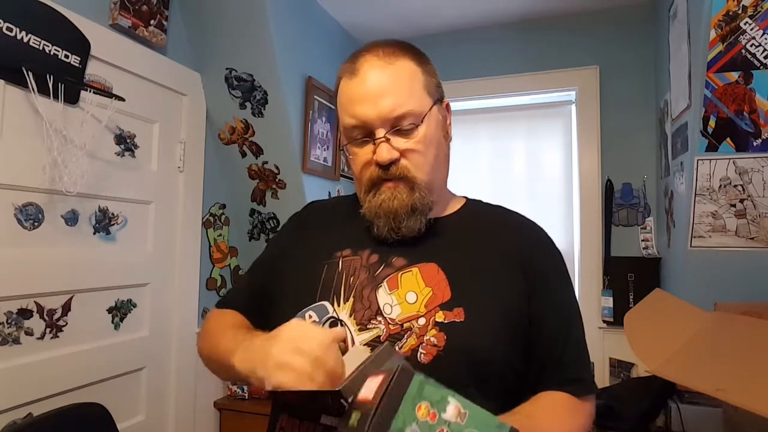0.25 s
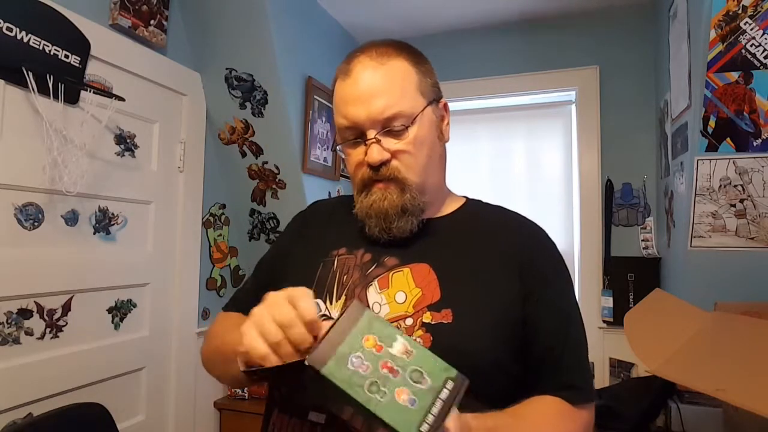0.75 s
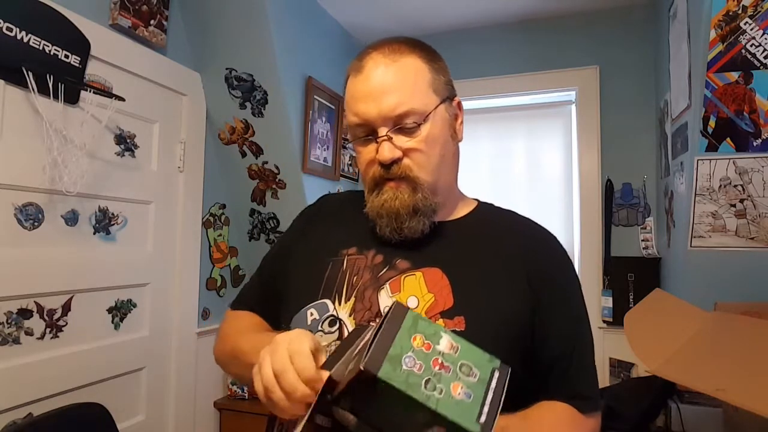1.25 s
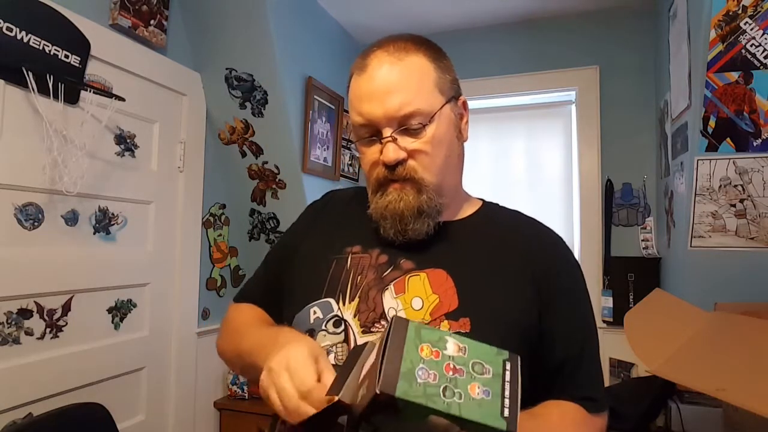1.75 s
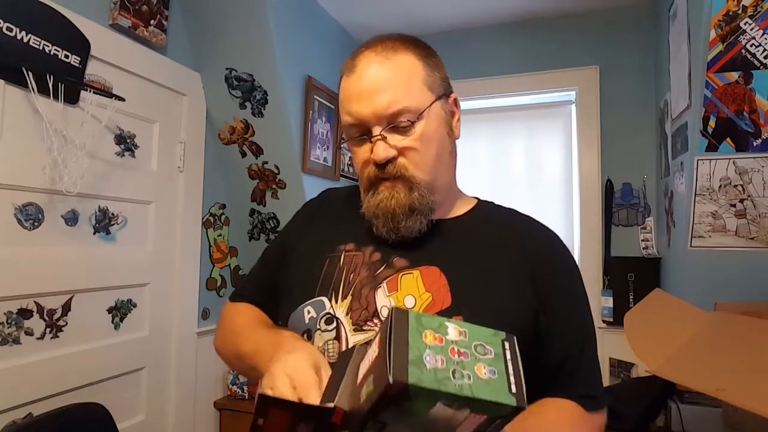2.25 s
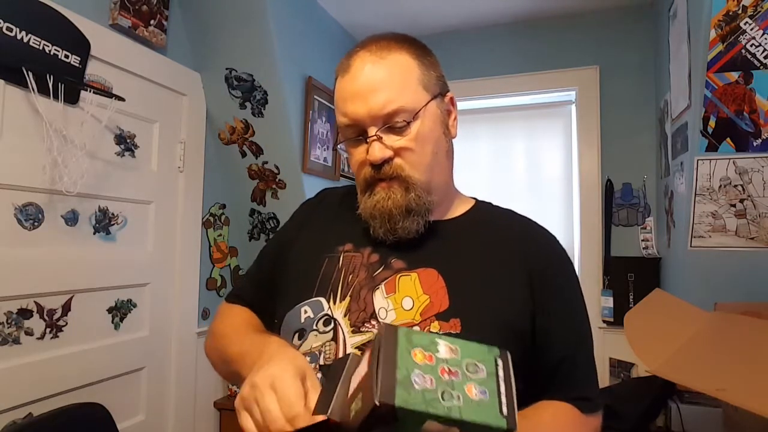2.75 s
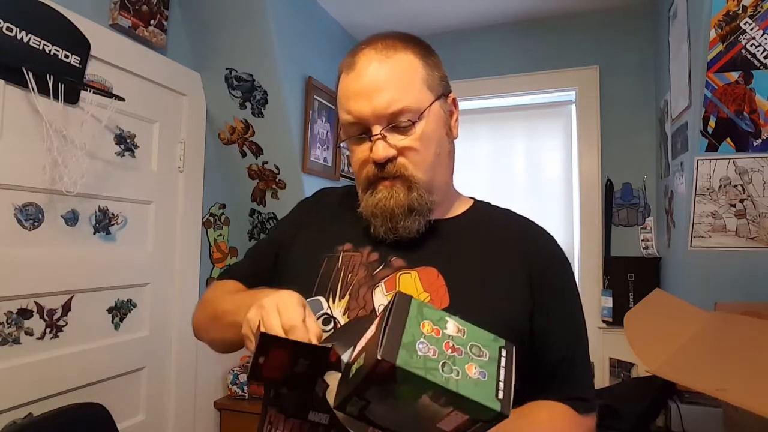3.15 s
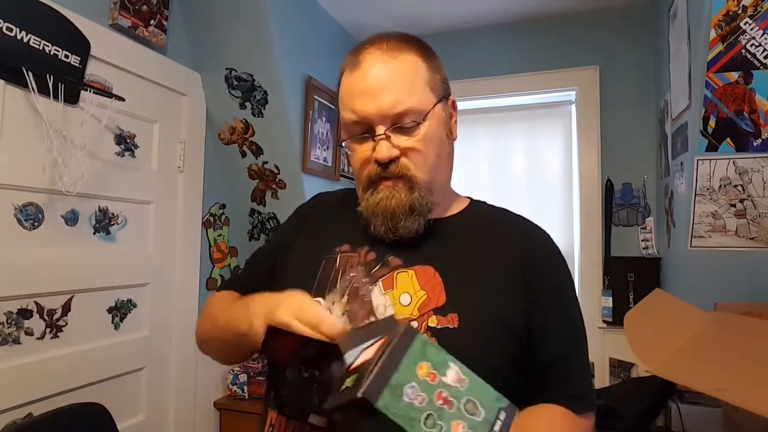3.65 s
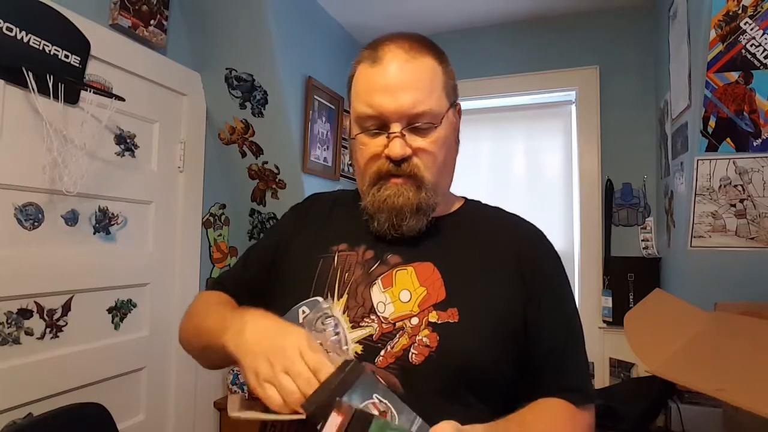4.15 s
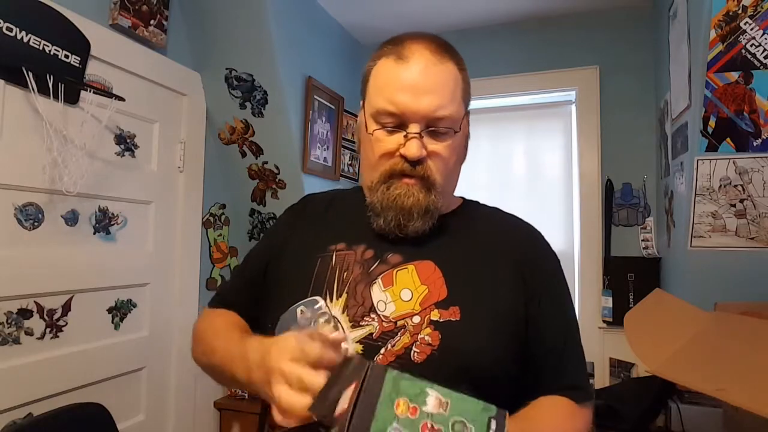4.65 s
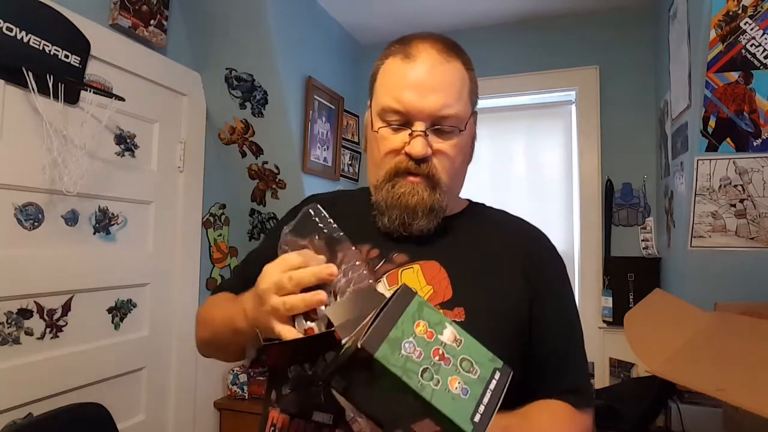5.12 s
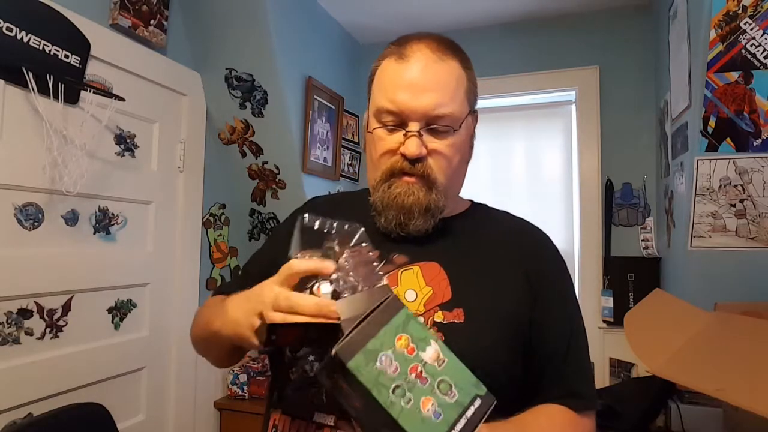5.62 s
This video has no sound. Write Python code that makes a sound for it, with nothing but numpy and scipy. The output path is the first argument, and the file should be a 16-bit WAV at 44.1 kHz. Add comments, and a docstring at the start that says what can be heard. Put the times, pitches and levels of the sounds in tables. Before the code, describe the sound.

Close in a small quiet room, hands work at a small cardboard box: soft rubs and light hollow knocks, one early snap, then sharp cracks around two seconds and a dense cluster of pops past three seconds. Quieter sliding and tapping follows, with faint plastic crinkling near the end. Stereo microphone about an arm's length away, over low room noise.

```python
"""A brief rub and light knocks, then a snap: hands open a small cardboard box and slide out a plastic tray.
Card snaps as short noise bursts; fingers and tray tap the walls as softer bursts with a wall note.
Strokes rasp as random stick-slip clicks, a few squeaks glide, and late on the tray crinkles.
The hollow box colours every contact, an arm's length away; a small room answers over faint rumble, hiss and hum."""
import sys
import numpy as np
from scipy import signal
from scipy.fft import rfft, irfft
from scipy.io import wavfile
from scipy.ndimage import uniform_filter1d

SR = 44100
rng = np.random.default_rng(int(sys.argv[2]) if len(sys.argv) > 2 else 0)


def transcribe(signal):
    """Save signal, clipped to [-1, 1], as a 16-bit WAV file at the path in sys.argv[1]."""
    frames = np.atleast_2d(signal).T
    limited = np.clip(frames, -1, 1)
    pcm = np.round(limited * 32767).astype(np.int16)
    wavfile.write(sys.argv[1], SR, pcm)


N = 259308  # samples
SIZE = 32768  # burst and filter length, samples
BIN_HZ = np.maximum(np.arange(SIZE // 2 + 1) * SR / SIZE, 1)
BURST_TIME_S = np.arange(SIZE) / SR
TIME_S = np.arange(N) / SR

# All dB columns are relative levels; later stages trim them. Card snapping and buckling, with one plastic ping
# of the tray at 3.444 s: (time [s], strength [dB], crease crack [dB], fibre fizz [dB], time constant of the
# give [ms], lower ring [Hz], upper ring [Hz], upper ring [dB], facing the microphone [dB])
CARD_SNAPS = [(0.2445, 15.5, 2.5, -6.5, 2.8, 1190, 2030, 6.5, 2.5),
              (1.8106, 19, 11.5, -1.5, 2.1, 1080, 1600, 11, 4.5),
              (2.0323, 13.5, -1, -12.5, 1.7, 870, 1400, 10.5, 6),
              (2.1437, 23.5, 21.5, 12, 1.9, 1100, 1760, 7.5, 2),
              (2.781, 13.5, 7, 0, 1.27, 1070, 4190, 11.5, 5), (3.013, 2, -2.5, -6, 1, 590, 1520, 18, 2.5),
              (3.049, 20, 6.5, -7.5, 4, 1350, 2600, 4.5, 6.5),
              (3.4169, 24.5, 12, -9.5, 3.2, 530, 1660, 0.5, 1),
              (3.444, 17, 0, -3, 3.5, 453, 11500, 12.5, 6.5),
              (3.476, 22, 12.5, .5, 3.5, 1020, 2570, 6.5, 4), (3.6856, 13.5, 11, -3, 1.1, 606, 2270, 15, 4),
              (3.701, 18, 0, -10, 3.7, 586, 940, 7, 4)]
# Snap spectrum below its crack: (frequency [Hz], level [dB])
SNAP_BODY_DB = [(40, -37), (100, -9), (220, -11), (380, -0.5), (700, 3.5), (1600, 1.5)]
# A longer give moves more of the box: (frequency [Hz], gain per doubling of the give [dB])
GIVE_HEFT_DB = [(100, 8), (280, 6), (600, 0)]
# Colour of the straight sound of snaps, slightly fuller near 1500 Hz: (frequency [Hz], level [dB])
SNAP_STRAIGHT_DB = [(300, -2.5), (1500, 1), (4000, -0.5), (9000, -2)]
USUAL_GIVE_MS = 2.8
# faint soft noise burst shortly before each snap: lead, time constant, level relative to the snap's strength
LEAD_IN_S, LEAD_IN_MS, LEAD_IN_DB = 0.011, 2, -23.5

# Fingers, flap and tray knocking on the box: (time [s], strength [dB], hardness [dB], thump [dB],
# wall note [Hz], time constant of the contact [ms])
BOX_TAPS = [(0.125, 2, 0.5, 3.5, 714, 6), (0.193, -1.5, 9.5, -6, 1560, 8.3), (0.237, 4, 3, -7, 1107, 4.5),
            (0.372, -2, 2, 4, 573, 2.5), (0.455, -7, 2.5, -11, 570, 4.5),
            (0.547, 7.5, -5.5, -5.5, 680, 5.8), (0.645, 2.5, 2.5, -8, 1500, 8),
            (0.705, 7, -4, -3, 736, 5.8), (0.817, 8, 0, -14, 570, 2.5), (0.826, 2.5, -4, 10, 574, 3.2),
            (0.924, -5, -0.5, 4, 920, 3.8), (1.11, -3.5, 0.5, 0, 570, 3.6), (1.149, 1.5, -12, 1, 575, 4.3),
            (1.182, 4, 6, -3, 1460, 1.7), (1.632, 2.5, 2.5, 2, 558, 4.9), (1.936, 4.5, -2.5, -7, 1750, 2.2),
            (1.998, 0, -0.5, -9, 600, 4.1), (2.421, 3, -5.5, 3, 720, 3), (2.523, -5, 4, -10, 600, 7.1),
            (2.657, 5.5, -13, -3, 398, 4.3), (2.806, 11.5, 2, 3, 1540, 2.7),
            (2.827, 9, -1.5, -2.5, 1120, 3.5), (2.969, 4.5, -16, -1, 505, 2.6),
            (3.004, 3.5, -7, -12, 1410, 4.4), (3.277, 0.5, -7, -11, 1540, 2.7),
            (3.46, 17.5, -7, -29, 503, 3.6), (3.8227, 0, 7.5, 16, 466, 0.66),
            (3.83, 9, -21, -1.5, 474, 6.3), (4.09, -2.5, 2.5, -11, 750, 4), (4.224, 2, -24, -3, 696, 2.5),
            (4.339, 1, -26, 5.5, 680, 5.6), (4.48, -1.5, -20, 0, 604, 2.3), (4.579, -5, 1.5, 8, 570, 3.2),
            (4.689, 6, -2.5, 1.5, 1080, 4.5), (4.818, 1, -48, -2, 590, 4.7), (4.993, 7, -4, -6, 800, 1.5),
            (5.127, 11, -3, -5, 1580, 2.7), (5.23, 2, 1, -9, 564, 2.7), (5.382, -1, 7, -18, 556, 3),
            (5.462, -2, -27, -7, 565, 1.7), (5.611, -2, 12, 3, 1830, 6.2), (5.653, 4.5, -20, -5, 706, 1.6)]
# Ordinary knock spectrum: (frequency [Hz], level [dB])
KNOCK_DB = [(40, -35), (95, -6), (220, -7.5), (380, -3), (620, 1), (1050, -1), (1900, -1.5), (3900, -16.5),
            (7000, -25), (14500, -32.5)]
# A hard edge trades the hollow note for a tick: (frequency [Hz], share of the hardness [1])
HARDNESS_SHARE = [(450, -0.059), (1500, 0.2), (4000, 1)]
# A push of the hand moves the whole box: (frequency [Hz], share of the thump [1])
BOX_THUMP_SHARE = [(90, .9), (190, 1.23), (380, 0)]

# Strokes of hands, flap and tray: (start [s], length [s], finger drag [dB], card edge scrape [dB], wall note [Hz])
HAND_STROKES = [(-0.05, 0.098, -26.5, -24, 680), (0.04, 0.14, -38.5, -37.5, 600),
                (0.267, 0.14, -27.5, -35, 560), (0.475, 0.3, -41, -41.5, 617),
                (0.575, 0.17, -28.5, -35, 610), (0.72, 0.18, -25.5, -31.5, 730),
                (0.914, 0.14, -56, -44, 595), (1.03, 0.22, -46, -41.5, 577),
                (1.212, .12, -28.5, -29.5, 585), (1.361, 0.16, -47, -25, 709),
                (1.426, 0.16, -48, -28.5, 707), (1.517, 0.18, -34, -50, 560),
                (1.764, 0.16, -28.5, -34.5, 660), (1.988, 0.26, -27, -37.5, 716),
                (2.21, 0.31, -35.5, -40, 678), (2.534, 0.23, -32.5, -37, 560),
                (2.718, 0.3, -32, -39.5, 760), (2.928, 0.35, -26, -36, 635), (3.246, 0.3, -36.5, -37, 567),
                (3.53, 0.17, -25.5, -33.5, 615), (3.744, .3, -40, -37.5, 540),
                (4.021, 0.17, -32, -44.5, 635), (4.14, 0.35, -32, -41.5, 660),
                (4.47, 0.28, -38.5, -44.5, 606), (4.834, 0.26, -27.5, -33, 680),
                (4.951, .34, -28, -30.5, 600), (5.317, 0.22, -26.5, -36.5, 540),
                (5.477, 0.21, -38.5, -41, 640), (5.805, 0.16, -34, -38.5, 616)]
STROKE_ATTACK_S, STROKE_RELEASE_S = 0.052, 0.094
GRIP_DRAG_DB, GRIP_SCRAPE_DB = -45, -63  # the holding hand never lies quite still
# Dragging fingers: (frequency [Hz], level [dB])
DRAG_DB = [(30, -47), (70, -23), (120, -12), (230, -9.5), (420, -7.5), (620, -4.5), (800, -4.5),
           (1100, -6.5), (2000, -30), (6000, -68)]
# Scraping edge and faint lead-in: (frequency [Hz], level [dB])
SCRAPE_DB = [(100, -33), (500, -9), (1000, -4), (1700, 4.5), (2300, 1.5), (3200, -6.5), (5000, -16.5),
             (14000, -47.5)]
# Hiss of smooth faces: (frequency [Hz], level [dB])
HISS_DB = [(500, -49), (2000, 5), (4000, -2), (6500, -8), (9300, -15), (11000, -14), (14500, -15.5)]

# Tray flexing as it is gripped and pulled: (time [s], level [dB])
TRAY_FLEX_DB = [(4.8, -73), (5.0, -41), (5.2, -45), (5.32, -59), (5.42, -40), (5.56, -65), (5.64, -43.5),
                (5.74, -80)]
# Tray crinkle spectrum: (frequency [Hz], level [dB])
CRINKLE_DB = [(300, -20), (900, -2), (1700, 1), (3200, -4.5), (6000, -9), (14000, -22)]
# Squeaks of card on card: (start [s], length [s], pitch [Hz], glide [octaves], level [dB])
CARD_SQUEAKS = [(1.019, 0.05, 3000, -0.21, -50), (1.786, .022, 3520, -0.01, -50),
                (2.745, 0.023, 1460, 0.05, -37.5), (3.006, 0.028, 1530, -0.037, -30),
                (4.004, 0.015, 3000, -0.036, -46.5)]

# Resonances of the box and the air around it: (frequency [Hz], width [Hz], level [dB])
BOX_MODES = [(101.6, 5, 4), (125, 8.4, 3), (178, 65, 5.5), (225.6, 23, 3), (342, 86, 5.5), (371, 21, 5),
             (517, 31, 5), (591, 99, 5), (687.5, 26, 2.5), (780, 14, 0.5), (927, 75, -2), (997, 10, 1.5),
             (1175, 23, 4.5), (1437, 100, 1.5), (1800, 630, -3), (9040, 1930, 8)]
# Room decay: (frequency [Hz], T60 [s])
ROOM_T60_S = [(120, 0.31), (500, 0.11), (1000, 0.29), (2800, 0.27), (7000, 0.29), (14000, 0.15)]
# Likeness of the reflections at the two ports: (frequency [Hz], correlation [1])
PORT_CORRELATION = [(60, 0.84), (330, 0.92), (700, 0.71), (1200, -0.51), (2400, -0.07), (5000, -0.14),
                    (14000, -0.35)]
# Balance of the reflections: (frequency [Hz], left minus right [dB])
PORT_BALANCE_DB = [(100, -0.5), (350, 2), (700, -1), (1400, 2.5), (2800, -0.5), (5000, -4.5), (9000, 1.5),
                   (14000, 2.5)]
# Still room: (frequency [Hz], level [dB])
STILL_AIR_DB = [(20, -44), (55, -52), (115, -38), (200, -40), (500, -41), (1000, -48), (2500, -53),
                (6000, -67), (14500, -71.5)]
HUM_HZ = 120
TOP_HZ = 14600  # low-pass edge of the output


def snaps(ring_width=0.27, gain_db=-1.5, low_ring_db=5.5, top_db=-7.5, early_s=.003):
    """The flap pops free and panels buckle, each with two rings; rows: towards the microphone, into the room."""
    out = np.zeros((2, N))
    for time_s, strength_db, crack_db, fizz_db, give_ms, low_hz, high_hz, high_db, facing_db in CARD_SNAPS:
        body = [(hz, strength_db + db) for hz, db in SNAP_BODY_DB]
        shape = body + [(3900, crack_db), (8500, fizz_db), (14500, fizz_db + top_db)]
        heft_db = along(GIVE_HEFT_DB) * np.log2(give_ms / USUAL_GIVE_MS)
        low_ring = low_ring_db * peak(low_hz, ring_width * low_hz)
        high_ring = high_db * peak(high_hz, ring_width * high_hz)
        sound = give(give_ms, gain_db + along(shape) + heft_db + low_ring + high_ring)
        # a panel facing the microphone sends it more of the first crack
        add(out, time_s - early_s, np.array([undb(facing_db) * sound, sound]))
        lead_in = give(LEAD_IN_MS, LEAD_IN_DB + along(SCRAPE_DB) + strength_db)
        add(out, time_s - early_s - LEAD_IN_S, lead_in)
    return colour(out[0], SNAP_STRAIGHT_DB), out[1]


def taps(gain_db=-1, ring_db=7.5, ring_width=0.19, early_s=.003):
    """Light knocks: the touched wall adds its note to the knock; a hard edge adds a tick."""
    out = np.zeros(N)
    for time_s, strength_db, hardness_db, thump_db, note_hz, contact_ms in BOX_TAPS:
        shape_db = along(KNOCK_DB) + hardness_db * along(HARDNESS_SHARE) + thump_db * along(BOX_THUMP_SHARE)
        ring = ring_db * peak(note_hz, ring_width * note_hz)
        add(out, time_s - early_s, give(contact_ms, gain_db + strength_db + shape_db + ring))
    return out


def give(time_constant_ms, spectrum_db):
    """One yield or contact: a quick run of random slips through the colour of the spot."""
    age = BURST_TIME_S / (max(time_constant_ms, .2) / 1000)
    slips = rng.standard_normal(SIZE) * np.sqrt(age) * np.exp(-age)
    lead_samples = SR // 500
    burst = np.roll(even(slips, 204), lead_samples)
    return irfft(rfft(burst) * causal(spectrum_db))[:SIZE // 4]


def sliding(drag_db=0, note_db=1, scrape_db=.5, hiss_db=-19.5, hiss_growth=0.72):
    """Fingers drag over the walls, the flap's edge scrapes, and smooth faces hiss along with the edge."""
    drag, scrape = pressure()
    hiss = scrape ** hiss_growth
    walls = colour(friction(rate_hz=120, spread_db=5, smooth=0.67) * drag, DRAG_DB)
    walls = walls + undb(note_db) * wall_ring(walls)
    edge = friction(rate_hz=500, spread_db=2.5, smooth=1.0)
    edge_scrape = colour(edge * scrape, SCRAPE_DB)
    face_hiss = colour(edge * hiss, HISS_DB)
    return undb(drag_db) * walls + undb(scrape_db) * edge_scrape + undb(hiss_db) * face_hiss


def pressure():
    """Strokes swell and let go over the faint rub of the grip; gains of the drag and of the scrape."""
    drag, scrape = undb(GRIP_DRAG_DB), undb(GRIP_SCRAPE_DB)
    for start_s, length_s, drag_db, scrape_db, _ in HAND_STROKES:
        rise = (TIME_S - start_s) / STROKE_ATTACK_S
        fall = (start_s + length_s - TIME_S) / STROKE_RELEASE_S
        push = np.clip(np.minimum(rise, fall), 0, 1)
        drag = np.hypot(drag, push * undb(drag_db))
        scrape = np.hypot(scrape, push * undb(scrape_db))
    return drag, scrape


def friction(rate_hz, spread_db, smooth, window_s=.045):
    """Stick-slip: uneven random clicks over a smooth rub; a steady supply of work holds the running rms near 1."""
    sizes = undb(spread_db * np.minimum(rng.exponential(size=N), 3))
    slips = (rng.random(N) < rate_hz / SR) * sizes * rng.choice([-1, 1], N)
    rub = slips / slips.std() + smooth * rng.standard_normal(N)
    power = uniform_filter1d(rub ** 2, int(window_s * SR) + 1)
    return rub / np.sqrt(np.abs(power) + 1e-6)


def wall_ring(x, sharpness=5):
    """A resonance that follows the fingers: neighbouring patches of wall take over from one another."""
    start_s, length_s, *_, stroke_hz = np.transpose(HAND_STROKES)
    note_hz = np.interp(TIME_S, start_s + length_s / 2, stroke_hz)
    patches_hz = np.geomspace(400, 1000, 7)
    out = 0
    for hz, row in zip(patches_hz, np.eye(len(patches_hz))):
        share = np.interp(note_hz, patches_hz, row)
        out = out + signal.lfilter(*signal.iirpeak(hz, sharpness, fs=SR), x * share)
    return out


def crinkle(rate_hz=50, spread_db=5):
    """Sparse small buckles of the thin plastic tray, as stick-slip clicks."""
    flex_db = np.interp(TIME_S, *np.transpose(TRAY_FLEX_DB), left=-np.inf, right=-np.inf)
    return colour(friction(rate_hz, spread_db, smooth=0.24) * undb(flex_db), CRINKLE_DB)


def squeaks(unsteady=0.113):
    """For a moment the slips lock into a pitch, which wavers and glides."""
    out = np.zeros(N)
    for start_s, length_s, pitch_hz, glide_octaves, level_db in CARD_SQUEAKS:
        progress = np.linspace(0, 1, int(length_s * SR))
        waver = uniform_filter1d(rng.standard_normal(SIZE), size=40)[:len(progress)]
        glide_hz = pitch_hz * 2 ** (glide_octaves * progress)
        moving_hz = glide_hz * (1 + unsteady * waver / waver.std())
        tone = np.sin(2 * np.pi * np.cumsum(moving_hz) / SR)
        add(out, start_s, undb(level_db) * np.sin(np.pi * progress) * tone)
    return out


def room(straight, scattered, direct_db=-7.0, echo_db=0.0, direct_ring=0.17):
    """The straight sound reaches both ports alike; the box's ring and the walls' echoes follow it."""
    box_db = sum(db * peak(hz, width_hz) for hz, width_hz, db in BOX_MODES)
    mid, side = (rfft(reflections(gap_s=0.0028, build_s=0.0026)) for _ in range(2))
    alike = np.clip(along(PORT_CORRELATION), -.95, .95)
    direct = signal.fftconvolve(straight, irfft(causal(direct_db + direct_ring * box_db)))[:N]
    out = []
    for sign in (1, -1):  # left, right
        echoes = mid * np.sqrt((1 + alike) / 2) + sign * side * np.sqrt((1 - alike) / 2)
        response = echoes * causal(echo_db + box_db + sign * along(PORT_BALANCE_DB) / 2)
        out.append(direct + signal.fftconvolve(scattered, irfft(response))[:N])
    return np.array(out)


def reflections(gap_s, build_s):
    """Dense echoes of a small room, each band dying at its own pace; unit energy before the cut at 0.5 s."""
    noise = rfft(rng.standard_normal(SIZE))
    centres_hz = 62.5 * 2 ** np.arange(9)
    out = 0
    for row, t60_s in zip(np.eye(len(centres_hz)), along(ROOM_T60_S, centres_hz)):
        band = irfft(noise * along(np.c_[centres_hz, row]))
        out = out + band * np.exp(-np.log(1000) * BURST_TIME_S / t60_s)
    onset = np.clip((BURST_TIME_S - gap_s) / build_s, 0, 1)
    return even(out * onset, 71) * (BURST_TIME_S > gap_s) * (BURST_TIME_S < .5)


def still_air(hum_db=-70, apart=0.51):
    """Faint room rumble and hiss, partly shared by the channels, with a mains hum."""
    shared = rng.standard_normal(N)
    air = np.array([colour(shared + apart * rng.standard_normal(N), STILL_AIR_DB) for _ in range(2)])
    return air + undb(hum_db) * np.sin(2 * np.pi * HUM_HZ * TIME_S)


def undb(db):
    """Decibels to gain."""
    return 10 ** (np.asarray(db) / 20)


def along(points, hz=BIN_HZ):
    """Join (frequency [Hz], value) points on a log-frequency axis."""
    point_hz, value = np.transpose(points)
    return np.interp(np.log(hz), np.log(point_hz), value)


def causal(db):
    """Minimum-phase spectrum with this gain: the response starts at once and rings afterwards."""
    cepstrum = irfft(np.log(undb(db)))
    cepstrum[1:SIZE // 2] *= 2
    cepstrum[SIZE // 2 + 1:] = 0
    return np.exp(rfft(cepstrum))


def colour(x, points):
    """Filter a sound by a (frequency [Hz], level [dB]) spectrum."""
    return signal.fftconvolve(x, irfft(causal(along(points))))[:N]


def peak(hz, width_hz):
    """Bell of one resonance, 1 at its centre."""
    return 1 / (1 + (2 * (BIN_HZ - hz) / width_hz) ** 2)


def even(x, width_hz):
    """Unit-energy burst: broad colour levelled, fine grain kept."""
    spectrum = rfft(x)
    bins = int(width_hz * SIZE / SR) + 1
    power = uniform_filter1d(uniform_filter1d(np.abs(spectrum) ** 2, bins), bins)
    return irfft(spectrum / np.sqrt(np.abs(power) + 1e-18))


def add(track, time_s, sound):
    """Mix a sound in at a time."""
    i = max(int(time_s * SR), 0)
    track[..., i:i + sound.shape[-1]] += sound[..., :max(N - i, 0)]


def scene(taps_facing_db=6.0, slide_facing_db=3.5):
    """All handling sounds in the room, over the still air."""
    straight, scattered = snaps()
    knocks = taps()
    rubs = sliding() + crinkle() + squeaks()
    straight = straight + undb(taps_facing_db) * knocks + undb(slide_facing_db) * rubs
    return room(straight, scattered + knocks + rubs) + still_air()


def record(dry):
    """Round the highest peaks by soft saturation, then cut the top with a steep low-pass."""
    rounded = np.tanh(0.68 * dry) / 0.73
    low_pass = signal.ellip(8, .2, 70, TOP_HZ, fs=SR, output="sos")
    return signal.sosfilt(low_pass, rounded)


dry = scene()
out = record(dry)
transcribe(out)
```